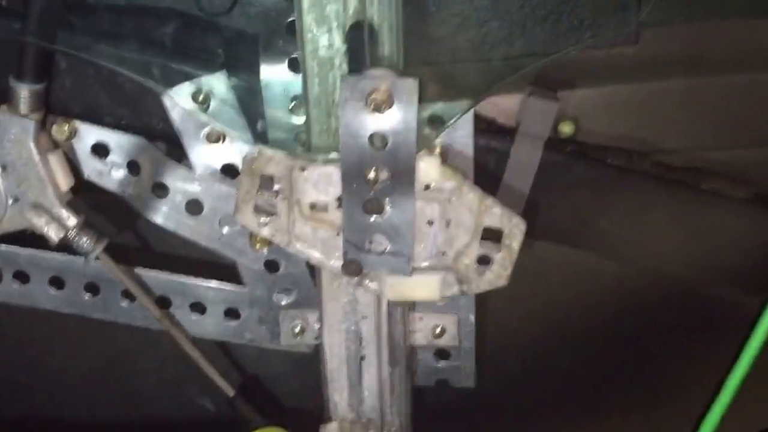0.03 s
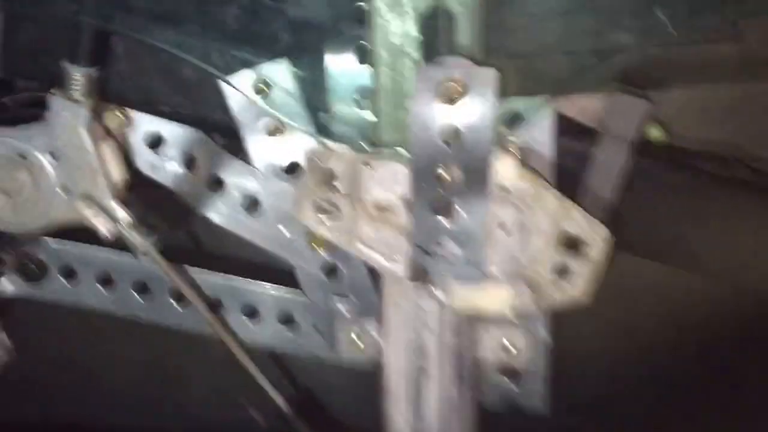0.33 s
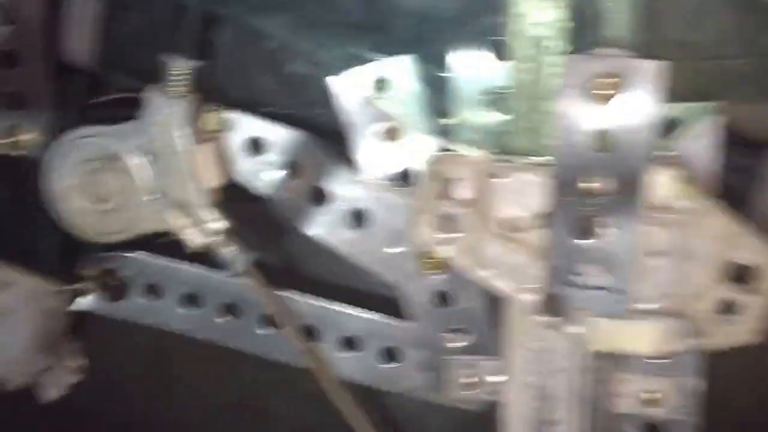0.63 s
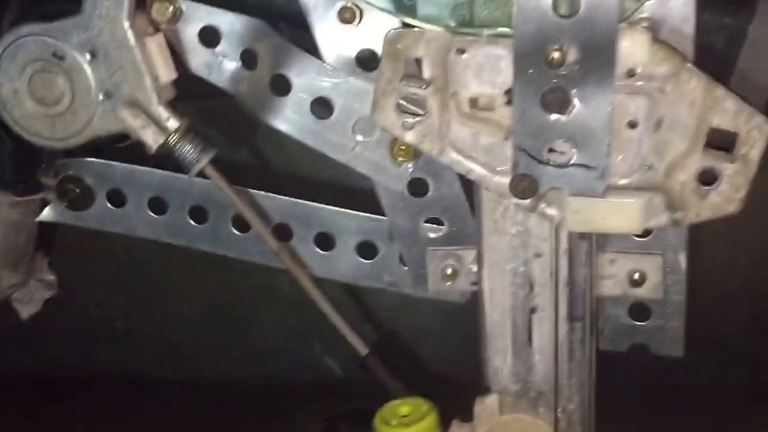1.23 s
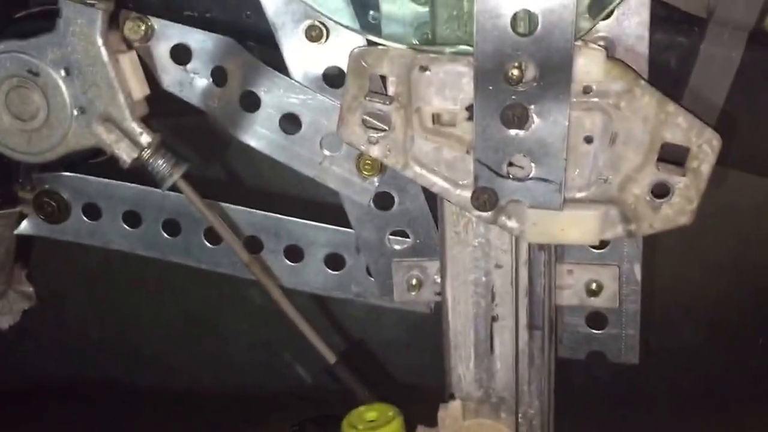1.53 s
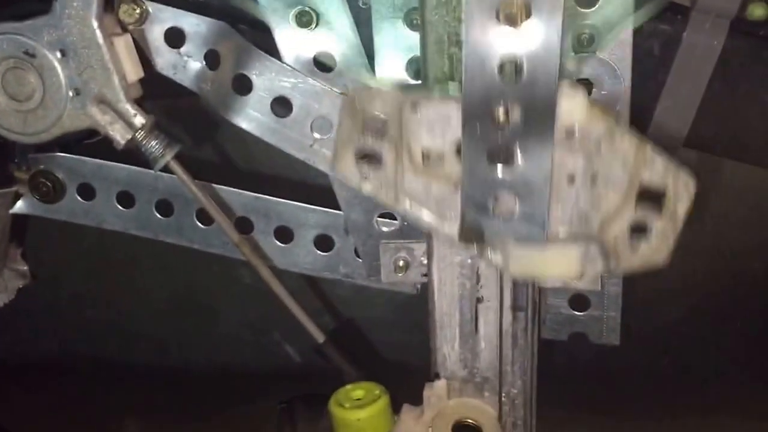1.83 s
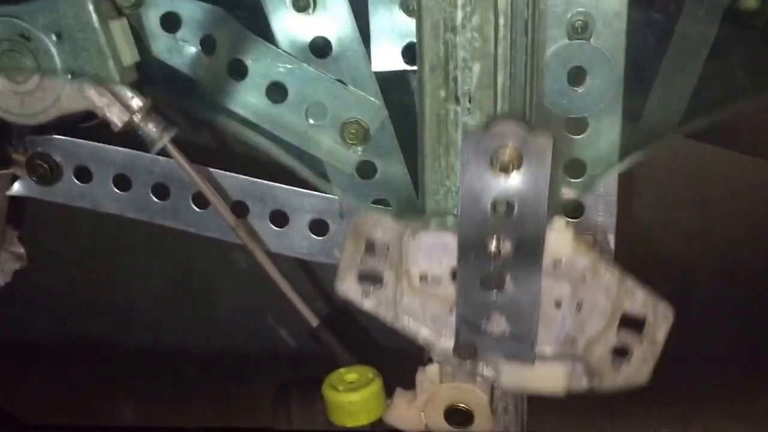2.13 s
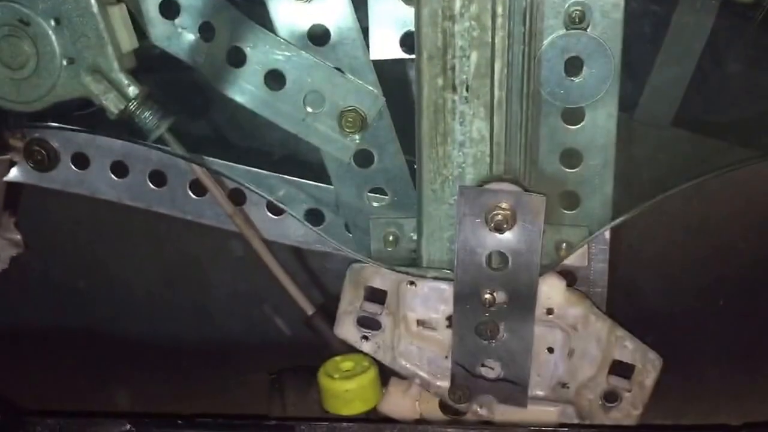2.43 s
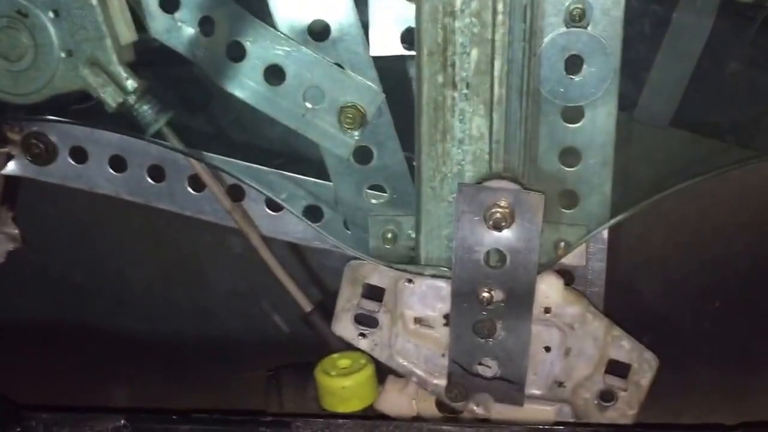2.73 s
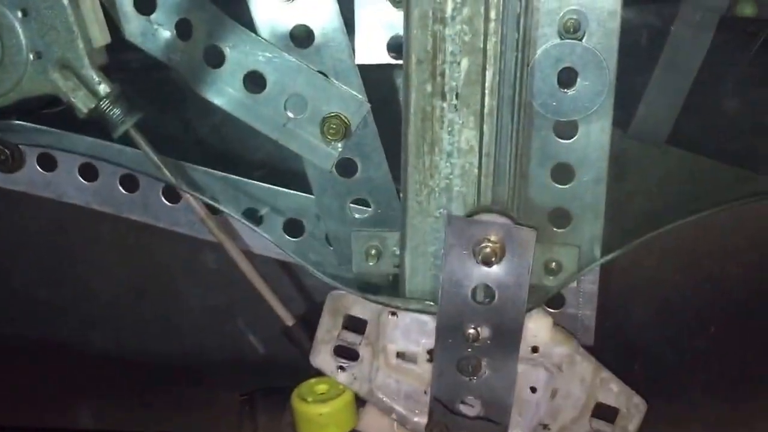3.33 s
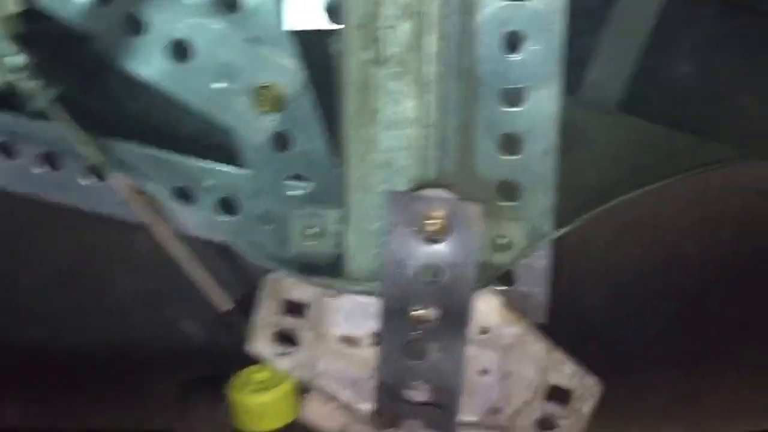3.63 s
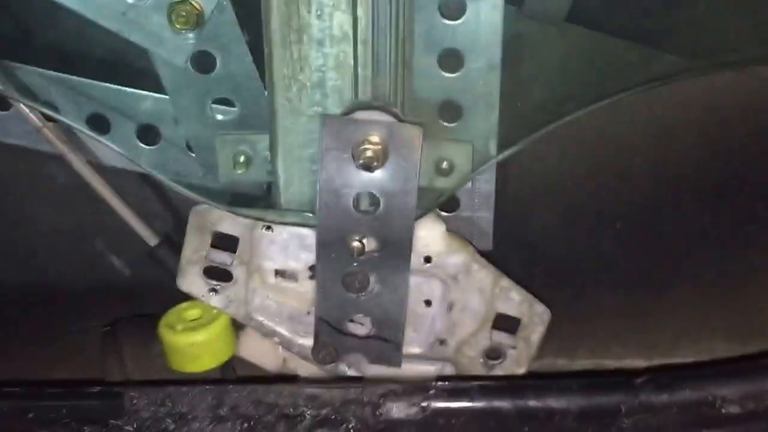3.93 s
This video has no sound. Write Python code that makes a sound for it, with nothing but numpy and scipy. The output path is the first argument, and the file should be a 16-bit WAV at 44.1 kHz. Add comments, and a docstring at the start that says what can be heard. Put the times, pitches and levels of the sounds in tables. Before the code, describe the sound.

A power window motor runs close by inside a car door. At first there is only a faint rumble and a soft bump near 0.6 seconds. At 1.8 seconds the motor starts with a knock, then whirs and scrapes along its rail, stopping with a lighter thud at 2.4. A second short burst at 3.1 ends in a loud, rattling clunk that briefly rings the door.

```python
"""Power window in an open car door

The motor takes up its slack with a knock and runs the carrier down the rail, humming and scraping.
A second short push on the switch drives the carrier into its end stop: a rattling clunk that rings
the door. Behind it are a low rumble and a faint, high, pulsing chirr like a distant cricket."""
import sys
import numpy as np
from scipy import signal
from scipy.fft import rfft, irfft, next_fast_len
from scipy.io import wavfile
from scipy.ndimage import map_coordinates

SR = 44100
rng = np.random.default_rng(int(sys.argv[2]) if len(sys.argv) > 2 else 0)


def digitize_waveform(pressure):
    """Quantize a signal to 16-bit integers and store it at the path in sys.argv[1].

    Rows of a 2-D input are taken as channels; values are limited to [-1, 1].
    """
    field = np.atleast_2d(pressure).T
    bounded = np.clip(field, -1, 1)
    quanta = np.round(bounded * 32767).astype(np.int16)
    wavfile.write(sys.argv[1], SR, quanta)


N = 176400

# late decay of the door's panel and hollow: f/Hz, t60/s
LATE_DECAY = [(60, .8), (200, 0.35), (800, 0.37), (1500, .34), (3500, 0.31), (6000, 0.26), (14000, .19)]


def amp(db):
    """Decibels to gain."""
    return 10 ** (np.asarray(db) / 20)


def unit(x):
    """Scale to rms 1."""
    return x / np.sqrt(np.mean(x ** 2) + 1e-20)


def fade(t, t60):
    """A decay that falls 60 dB in t60 seconds."""
    return np.exp(-np.log(1000) * t / t60)


def along(points, hz):
    """Read (f/Hz, value) points on a log frequency axis."""
    f, v = np.transpose(points)
    return np.interp(np.log(hz + 1), np.log(f + 1), v)


def curve(rows):
    """One value per sample from (t/s, value) rows."""
    return np.interp(np.arange(N) / SR, *np.transpose(rows))


def wobble(rate):
    """A smooth random curve, rate knots a second."""
    knots = rng.standard_normal(int(N * rate / SR) + 4)
    return map_coordinates(knots, [np.arange(N) * rate / SR])


def filtered(x, response):
    """Equalise x with a gain given as a function of frequency."""
    size = next_fast_len(len(x) + SR // 4)
    return irfft(rfft(x, size) * response(np.fft.rfftfreq(size, 1 / SR)), size)[:len(x)]


def low_cut(x, hz):
    """Roll off the bass at 12 dB an octave."""
    return signal.sosfilt(signal.butter(2, hz, 'high', fs=SR, output='sos'), x)


def noise(spectrum):
    """Coloured noise of rms 1."""
    return unit(filtered(rng.standard_normal(N), lambda hz: amp(along(spectrum, hz))))


def band(centre_hz, octaves):
    """A bell-shaped band of noise, rms 1."""
    bell = lambda hz: np.exp(-.5 * (np.log2((hz + 1) / centre_hz) / octaves) ** 2)
    return unit(filtered(rng.standard_normal(N), bell))


def add(track, s, sound):
    """Mix a sound in at s seconds."""
    part = track[round(s * SR):][:len(sound)]
    part += sound[:len(part)]


def background():
    """Low rumble and faint air."""
    # rumble spectrum: f/Hz, level/dB
    rumble_colour = [(20, -28), (45, -9.5), (66, 2.5), (100, -4.5), (135, -15.5), (200, -20), (400, -32.5),
                     (1000, -60.5)]
    # rumble envelope: t/s, level/dB
    rumble_level = [(0, -35), (.08, -54), (.3, -60), (.7, -61), (1.05, -60), (1.5, -63), (2.7, -59.5),
                    (3, -61), (3.6, -56), (4, -63.5)]
    # air spectrum: f/Hz, level/dB
    air_colour = [(100, 0.5), (250, -4), (1000, -1), (2300, -6), (4000, -10.5), (8500, -13.5),
                  (10500, -17.5), (12500, -15), (15000, -18)]
    return amp(curve(rumble_level)) * noise(rumble_colour) + amp(-73) * noise(air_colour)


def chirr():
    """A narrow, high band of noise swells and flutters like a distant cricket."""
    # crests of the swells: t/s, level/dB
    chirps = [(.07, -78), (.38, -73), (.79, -79), (1.15, -76.5), (1.51, -77.5), (2.53, -75.5), (2.84, -82),
              (3.05, -81.5), (3.48, -78.5), (3.8, -79)]
    t = np.arange(N) / SR
    width_s, floor_db, flutter_db = 0.074, -85.5, 2.5
    swells = sum(amp(db) * np.exp(-.5 * ((t - s) / width_s) ** 2) for s, db in chirps)
    return (amp(floor_db) + swells) * amp(flutter_db * wobble(30)) * band(6422, octaves=0.035)


def clicks():
    """A soft handling bump and a few short, light ticks."""
    # bump and ticks: t/s, level/dB, centre f/Hz, width/octaves
    taps = [(0.2374, -64, 12000, 0.43), (0.568, -62.5, 2200, 0.31), (0.57, -52, 1070, 0.1),
            (0.571, -42.5, 345, 0.51), (0.637, -65.5, 4500, 0.17), (1.7524, -55, 2700, .55),
            (1.7524, -56, 9500, 0.48), (3.0689, -58.5, 2780, 0.3), (3.069, -72, 10000, .6),
            (3.284, -59, 13500, .2), (3.6814, -76, 8000, .8)]
    out, t = np.zeros(N), np.arange(N) / SR
    for s, db, hz, octaves in taps:
        add(out, s, amp(db) * band(hz, octaves) * fade(t, t60=.04))
    return out


def arcs():
    """The brushes arc with a high fizz as the current is switched."""
    # arc bursts: t/s, level/dB
    bursts = [(1.8, -54), (2.359, -49), (3.113, -56.5)]
    out, t = np.zeros(N), np.arange(N) / SR
    for s, db in bursts:
        add(out, s, amp(db) * band(12100, octaves=0.37) * fade(t, t60=0.16))
    return out


def panel_ring(colour, decay, size=32768):
    """Dense panel modes of random phase, each dying at the rate of its frequency."""
    # panel response: f/Hz, level/dB
    panel = [(15, -66.5), (45, -25), (80, -12.5), (150, -1), (230, 4.5), (400, 2.5), (540, -6.5), (680, -2),
             (1050, -6.5), (1300, -12), (2000, -12.5), (3400, -14), (4600, -27), (8000, -27.5),
             (13000, -37.5), (15300, -35)]
    hz = np.fft.rfftfreq(size, 1 / SR)
    phases = np.exp(2j * np.pi * rng.random(len(hz)))
    spectrum = unit(amp(along(panel, hz))) * amp(along(colour, hz)) * phases * np.sqrt(size)
    t = np.arange(size) / SR
    centres, t60s = np.transpose(decay)
    crossovers = [along(np.c_[centres, row], hz) for row in np.eye(len(centres))]
    return sum(irfft(spectrum * share) * fade(t, t60) for share, t60 in zip(crossovers, t60s))


def cavity(x, wet_db):
    """The door's hollow rings on after the drive."""
    tail = panel_ring([(100, 0.0019), (10000, 0.0032)], LATE_DECAY)
    return x + amp(wet_db) * signal.fftconvolve(x, tail / np.linalg.norm(tail))[:N]


def rail():
    """The carrier scrapes unevenly along its rail."""
    # scrape envelope: t/s, level/dB
    scrape_level = [(1.795, -100), (1.806, -36), (1.9, -37), (1.96, -39), (2.06, -39.5), (2.18, -43.5),
                    (2.24, -39.5), (2.34, -45.5), (2.38, -41), (2.42, -45), (2.48, -100), (3.108, -100),
                    (3.12, -34.5), (3.18, -24.5), (3.26, -100)]
    # scrape spectrum: f/Hz, level/dB
    scrape_colour = [(40, -29), (90, -0.5), (200, -0.5), (245, -11), (290, 4), (340, -9.5), (450, -5),
                     (560, -10.5), (700, -13.5), (850, -13), (970, -7.5), (1150, -15), (1400, -18),
                     (2500, -24.5), (4000, -28.5), (7000, -51.5)]
    grain_db = 2.5
    return amp(curve(scrape_level)) * unit(noise(scrape_colour) * amp(grain_db * wobble(120)))


def shaft_tones(turns, orders):
    """Sines locked to multiples of the shaft speed, each wavering slightly in level."""
    out = np.zeros(N)
    for order, db in orders:
        peak = np.sqrt(2) * amp(db + 0.5 * wobble(14))
        out += peak * np.sin(2 * np.pi * (order * turns + rng.random()))
    return out


def brushes(turns):
    """The brushes repeat one scratchy pattern each turn and spark in time; the commutator whines."""
    # brush envelope: t/s, level/dB
    brush_level = [(1.794, -100), (1.799, -53.5), (1.83, -52.5), (1.89, -48.5), (1.95, -51), (2.12, -49),
                   (2.35, -51), (2.37, -46), (2.395, -60.5), (2.42, -62.5), (2.47, -100), (3.107, -100),
                   (3.116, -60), (3.19, -49.5), (3.24, -53.5), (3.285, -74.5), (3.31, -100)]
    # buzz spectrum at top speed: f/Hz, level/dB
    buzz_colour = [(300, -9), (1800, 5.5), (3300, -1), (5000, -6), (7000, -2.5), (10300, -5), (12700, 0),
                   (15300, -8)]
    # spark spectrum: f/Hz, level/dB
    spark_colour = [(300, -17), (1500, 1), (2600, 5.5), (4000, 3), (5000, -3), (6800, -1.5), (9000, -3.5),
                    (10300, -10), (11500, -6), (13500, -8.5), (15500, -11)]
    # commutator whine: shaft order, level/dB relative to the brush envelope
    whine = [(49, -18.5), (50, -12.5), (51, -20), (79, -17), (90, -17.5), (92, -19)]
    top_speed_hz, spark_depth, size = 136.4, .4, 2048
    orders = np.arange(112)
    weights = amp(along(buzz_colour, orders * top_speed_hz)) * (orders > 0)
    scatter = rng.standard_normal(len(orders)) + 1j * rng.standard_normal(len(orders))
    one_turn = unit(irfft(weights * scatter, size))
    buzz = np.interp(turns, np.arange(size) / size, one_turn, period=1)
    pulse = (np.cos(2 * np.pi * turns) + np.cos(4 * np.pi * turns)) / 2
    sparks = unit(noise(spark_colour) * (1 + spark_depth * pulse))
    return amp(curve(brush_level)) * (amp(0.76) * sparks + amp(-3) * buzz + shaft_tones(turns, whine))


def motor():
    """One shaft sets the pitch of brushes, gear whine and hum; the second push is brushes alone."""
    # shaft speed: t/s, turns per second/Hz
    speed = [(1.797, 40), (1.83, 105), (1.87, 124), (1.93, 133.6), (1.975, 135.6), (2.1, 136.1),
             (2.34, 136.4), (2.365, 135), (2.43, 50), (3.11, 40), (3.15, 108), (3.19, 122), (3.25, 30)]
    # gear whine envelope: t/s, level/dB
    gear_level = [(1.79, -120), (1.81, -78), (1.9, -43), (1.98, -43), (2.03, -38), (2.17, -40), (2.26, -42),
                  (2.36, -41.5), (2.41, -53), (2.44, -120)]
    # gear partials: shaft order, relative level/dB
    gear_orders = [(5, -16), (6, -10), (9, -22), (10, -14.5), (11, -17), (12, -19.5), (13, -24),
                   (16, -28.5), (17, -26.5), (19, -17), (24, -19), (25, -40.5), (30, -21), (32, -23.5)]
    # hum envelope: t/s, level/dB
    hum_level = [(1.79, -100), (1.81, -29), (1.9, -42), (1.97, -44), (2.04, -39), (2.13, -33), (2.19, -45),
                 (2.255, -26.5), (2.29, -37.5), (2.318, -27.5), (2.35, -43), (2.39, -41), (2.41, -62),
                 (2.44, -100)]
    # hum partials: shaft order, relative level/dB
    hum_orders = [(1, -13), (2, -7.5), (3, -15.5), (4, -18)]
    turns = np.cumsum(curve(speed) * (1 + .001 * wobble(40))) / SR
    scratch = brushes(turns)
    gears = amp(curve(gear_level)) * shaft_tones(turns, gear_orders)
    hum = amp(curve(hum_level)) * shaft_tones(turns, hum_orders)
    return hum + gears + scratch


def door_shake():
    """The door shakes with a low boom after the first knock and each stop."""
    # booms: t/s, f/Hz, level/dB, t60/s
    booms = [(1.868, 93, -30, .28), (2.4, 93, -34, .4), (3.195, 93, -23, .4), (3.2, 53, -38, .8),
             (3.205, 41, -41, .7)]
    out, t = np.zeros(N), np.arange(SR) / SR
    attack = 1 - np.exp(-t / .01)
    for s, hz, db, t60 in booms:
        add(out, s, amp(db) * np.sin(2 * np.pi * hz * t) * fade(t, t60) * attack)
    return out


def knocks():
    """Each contact of carrier and glass thuds through the panel and feeds the door's modes."""
    # contacts: t/s, bass level/dB, middle level/dB, treble level/dB
    contacts = [(1.802, -26, -56, -40.5), (1.813, -45, -23, -28.5), (1.841, -30, -12.5, -32),
                (1.848, -16, -22.5, -26), (1.857, -20.5, -29, -46), (1.87, -15, -38, -28),
                (2.051, -60, -32, -44.5), (2.125, -52, -33, -29), (2.36, -32.5, -29.5, -43),
                (2.369, -45, -33, -31.5), (2.378, -30.5, -32.5, -32), (3.153, -31.5, -12, -29),
                (3.16, -10, -20.5, -34), (3.188, -18, -13, -21.5), (3.1905, -7.5, -4.5, -8),
                (3.198, -10.5, -10.5, -10), (3.206, -16.5, -21.5, -13), (3.217, -20, -23, -24.5),
                (3.23, -25, -28, -40.5)]
    # door and rail modes: f/Hz, relative level/dB, t60/s
    modes = [(93, -12, 0.37), (133.4, -5.5, 0.24), (163.5, -2.5, .14), (206.1, -2.5, .24), (293, -9.5, .28),
             (364, -6.5, 0.063), (464, -11, 0.24), (616, -25.5, 0.41), (645, -6, 0.12),
             (745.6, -25.5, 0.49), (886.5, -7, .12), (987, -24, 0.35), (1476, -13.5, 0.14),
             (2444, -16.5, 0.097), (3126, -22.5, .17)]
    # early decay of the panel: f/Hz, t60/s
    early_decay = [(150, .085), (600, 0.072), (3000, 0.063), (12000, 0.038)]
    bass_hz, middle_hz, treble_hz = 220, 970, 4000
    thud_db, tail_db, ring_db = -2.5, -25.5, -7
    out, t = np.zeros(N), np.arange(SR) / SR
    attack = 1 - np.exp(-t / 0.0003)
    energies = np.zeros((len(modes), N))
    for s, bass, middle, treble in contacts:
        colour = [(bass_hz, bass), (middle_hz, middle), (treble_hz, treble)]
        thud = amp(thud_db) * panel_ring(colour, early_decay)
        tail = amp(tail_db) * panel_ring(colour, LATE_DECAY)
        add(out, s, (thud + tail) * attack[:len(thud)])
        for energy, (hz, db, t60) in zip(energies, modes):
            ring = amp(ring_db + db + along(colour, hz)) * attack * fade(t, t60)
            add(energy, s, ring ** 2)  # hits pile up in energy, so they never cancel
    for energy, (hz, _, _) in zip(energies, modes):
        out += np.sqrt(energy) * np.sin(2 * np.pi * (hz * np.arange(N) / SR + rng.random()))
    return low_cut(out, hz=72.6)


def scene():
    """The drive inside the door, its knocks, small ticks and the surroundings, in mono."""
    drive = cavity(motor() + rail(), wet_db=-17.5)
    return (drive + knocks() + door_shake() + clicks() + arcs() + background() + chirr())[None]


def record(dry):
    """The microphone sheds the deepest bass; a steep cut takes off the very top."""
    return filtered(low_cut(dry[0], hz=12), lambda hz: hz < 15350)[None]


dry = scene()
out = record(dry)
digitize_waveform(out)
```